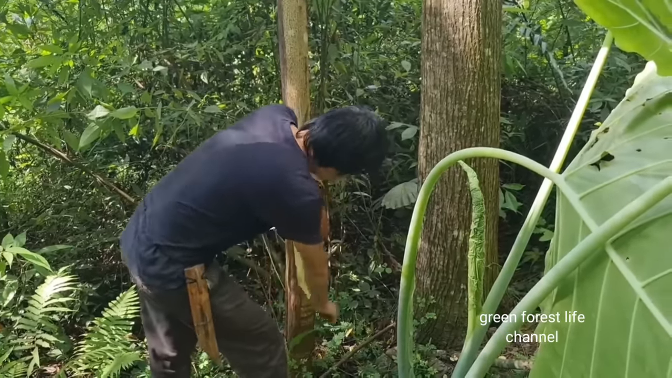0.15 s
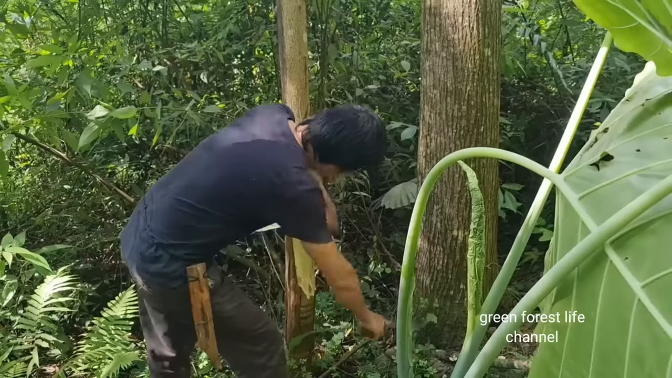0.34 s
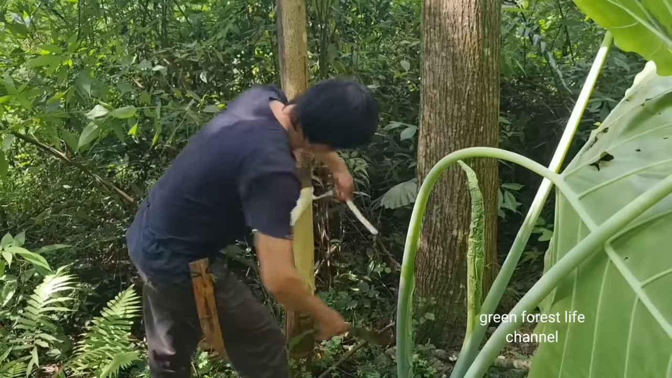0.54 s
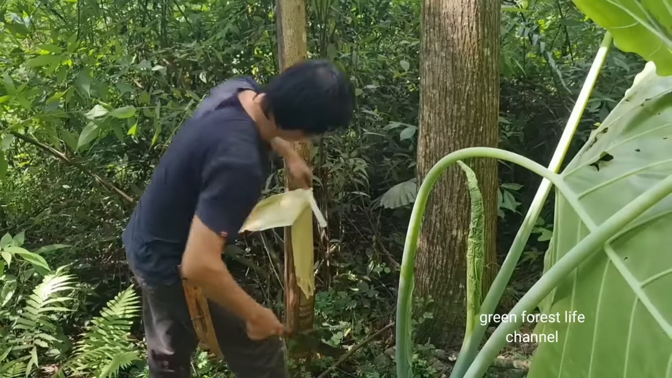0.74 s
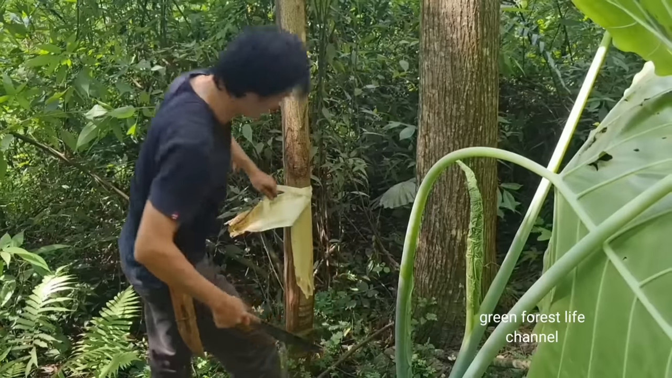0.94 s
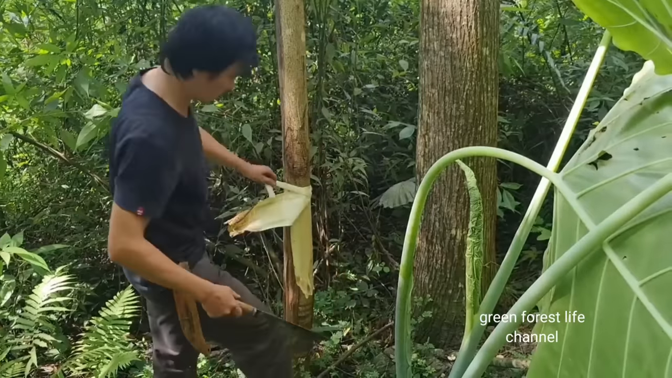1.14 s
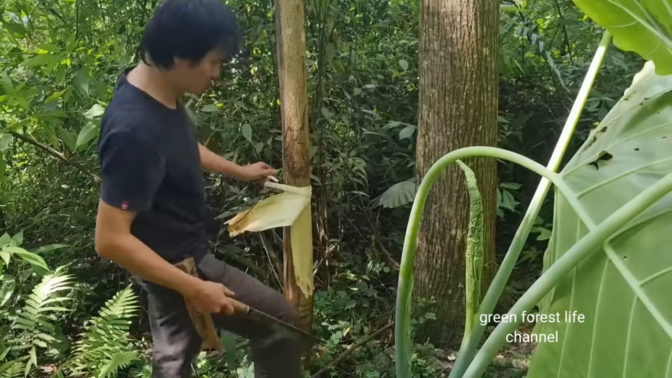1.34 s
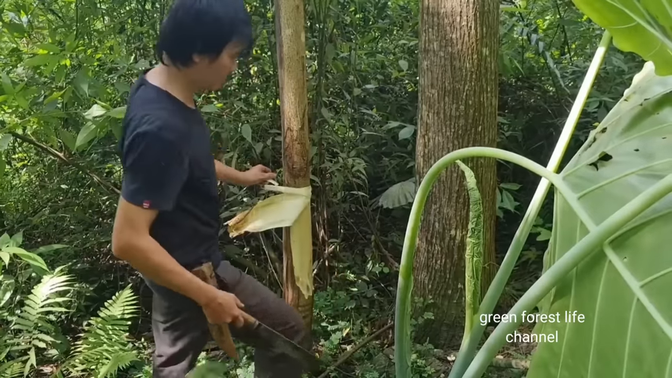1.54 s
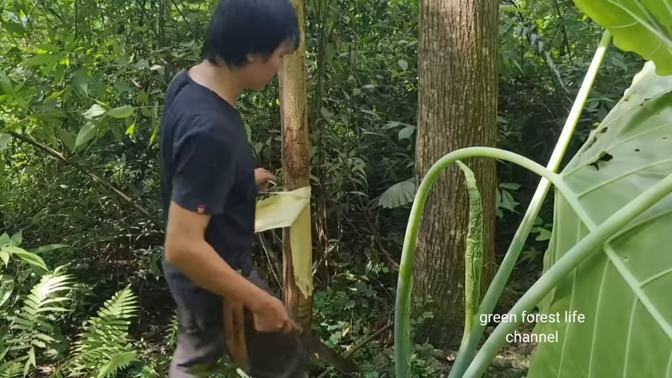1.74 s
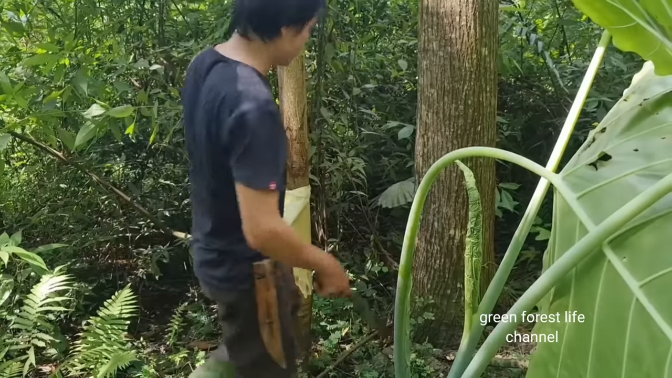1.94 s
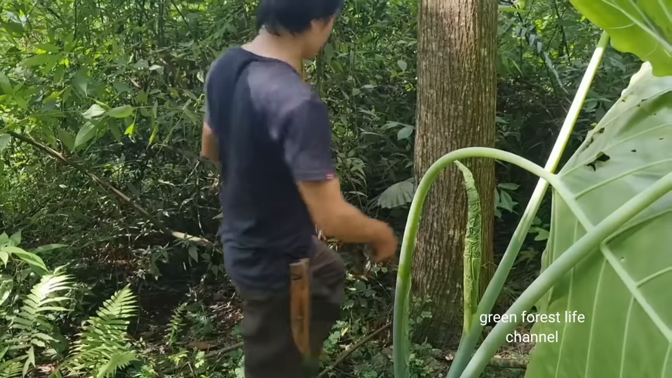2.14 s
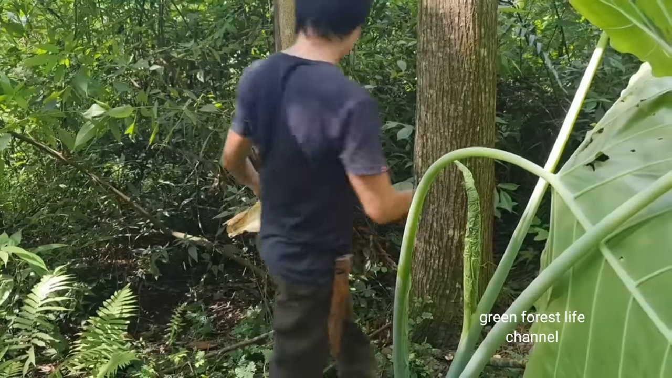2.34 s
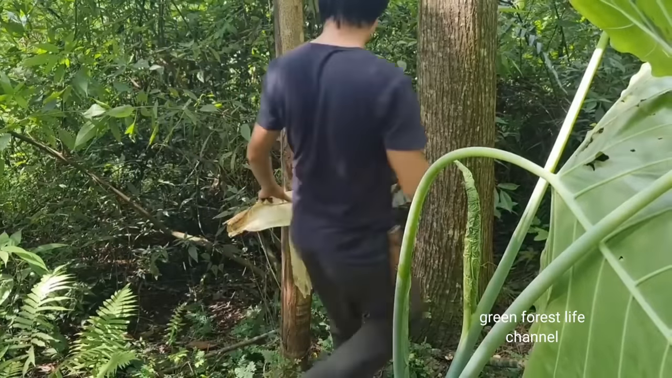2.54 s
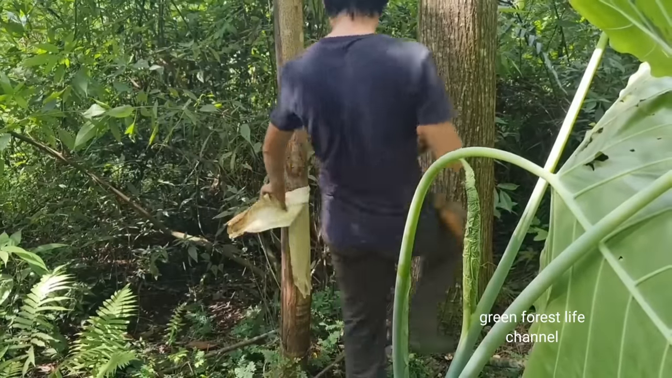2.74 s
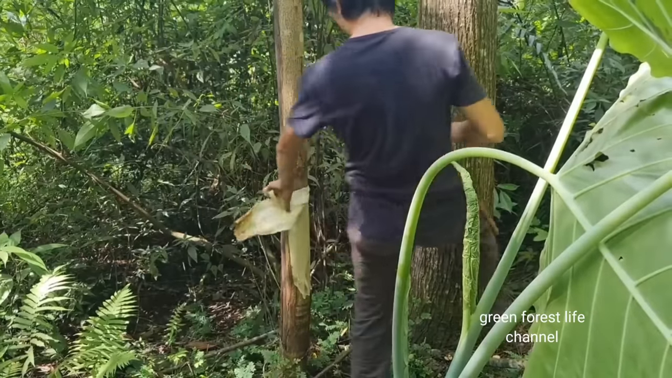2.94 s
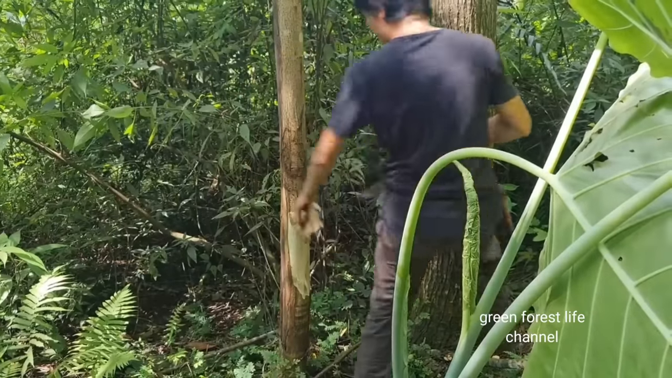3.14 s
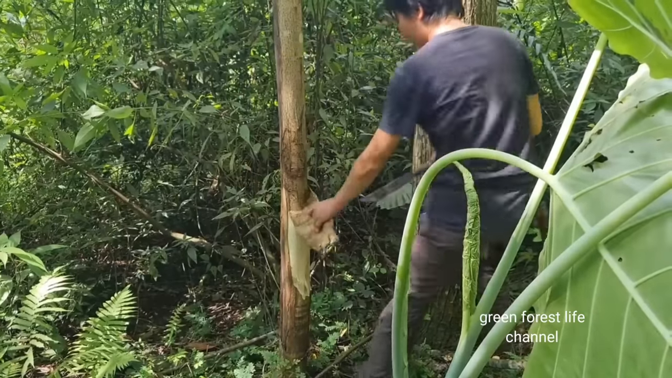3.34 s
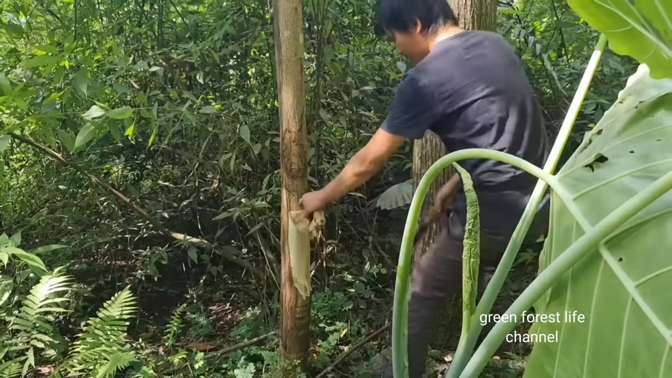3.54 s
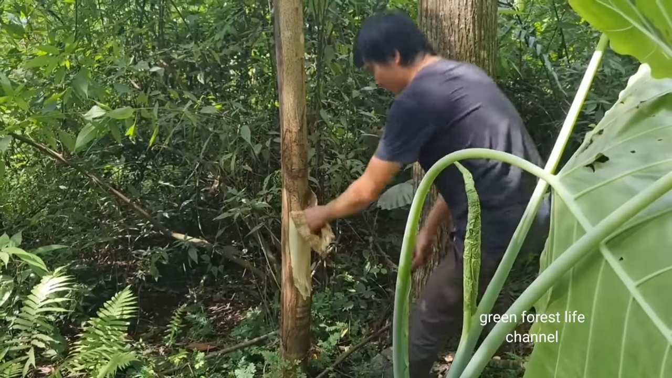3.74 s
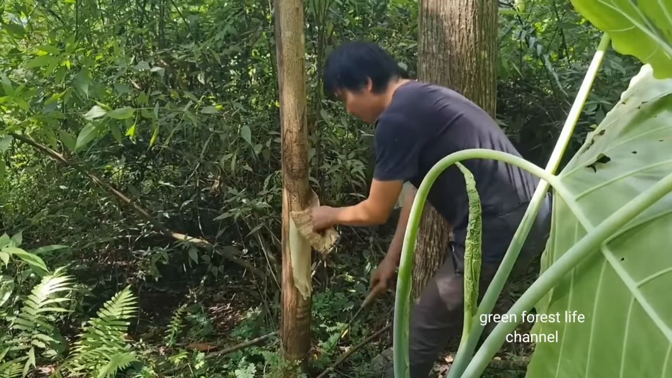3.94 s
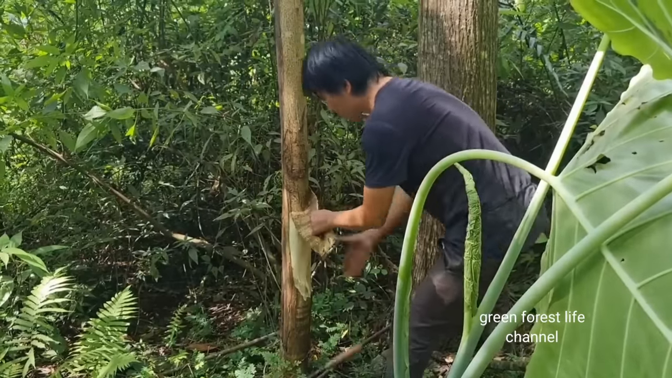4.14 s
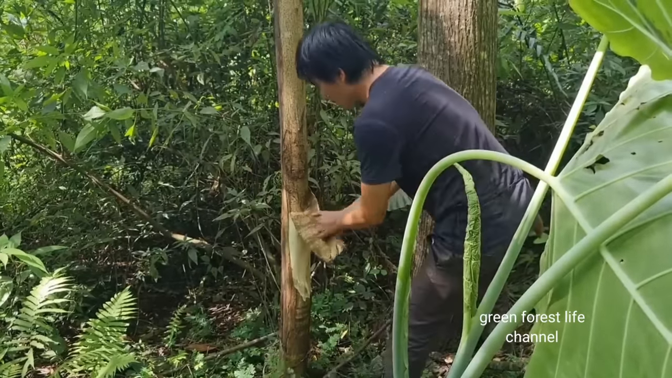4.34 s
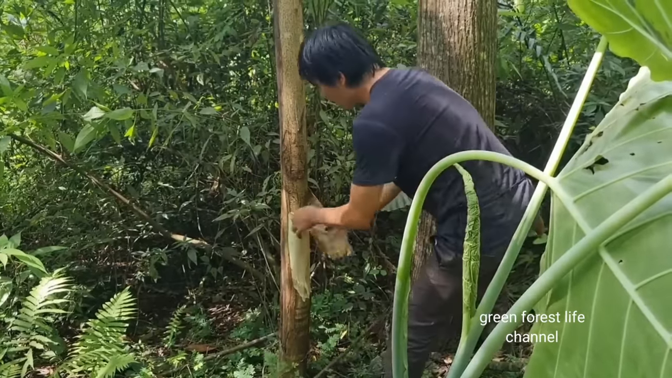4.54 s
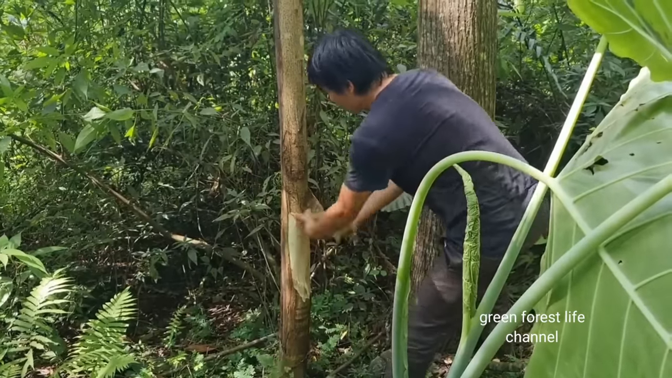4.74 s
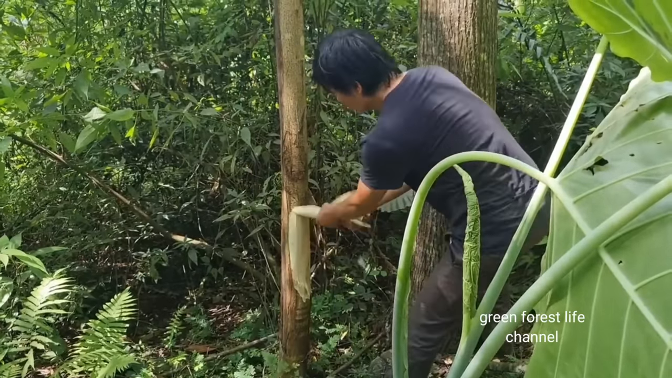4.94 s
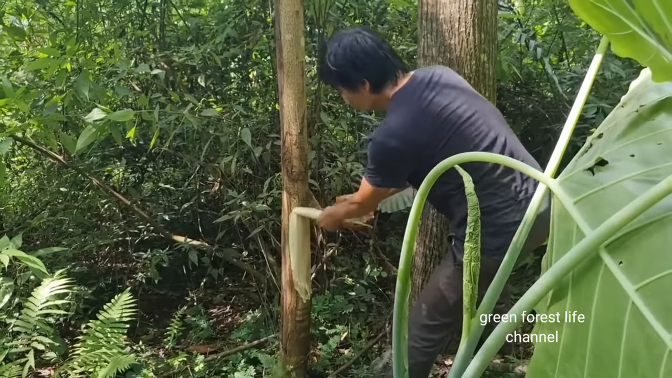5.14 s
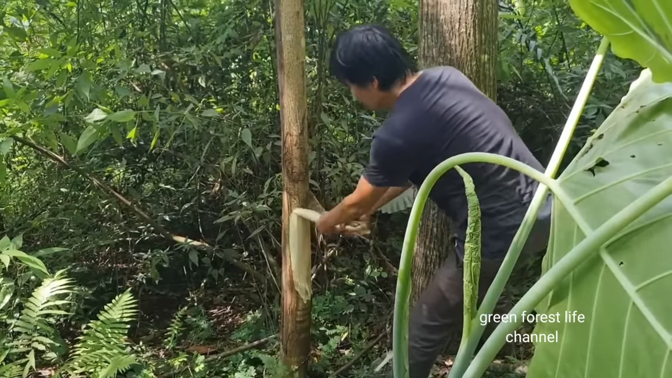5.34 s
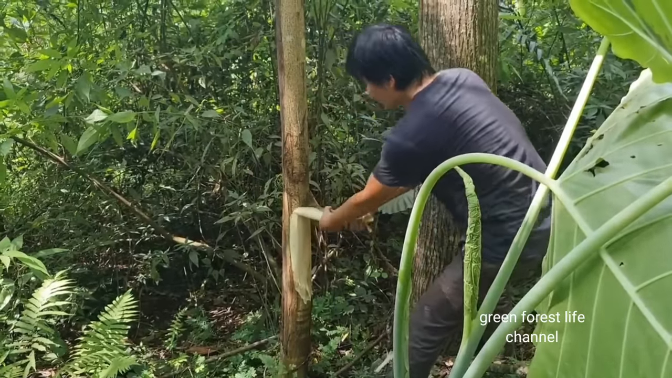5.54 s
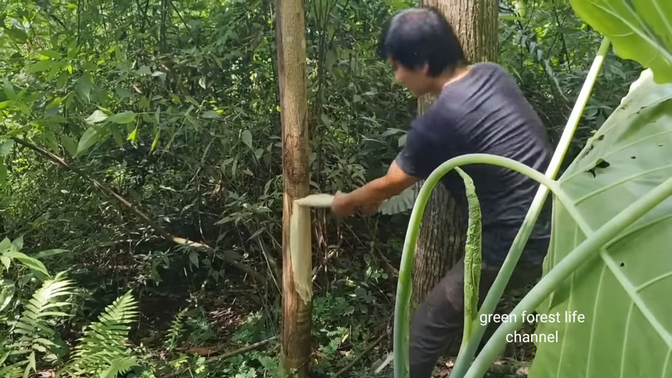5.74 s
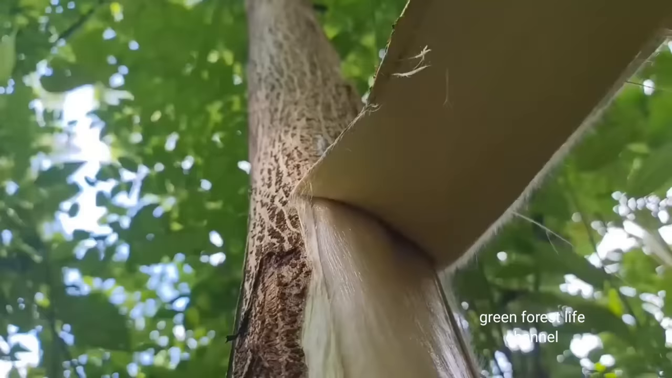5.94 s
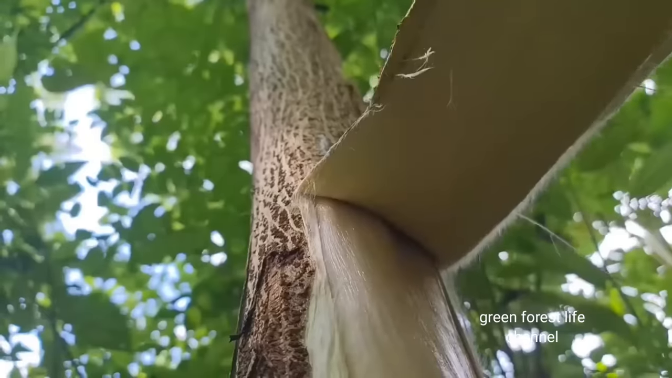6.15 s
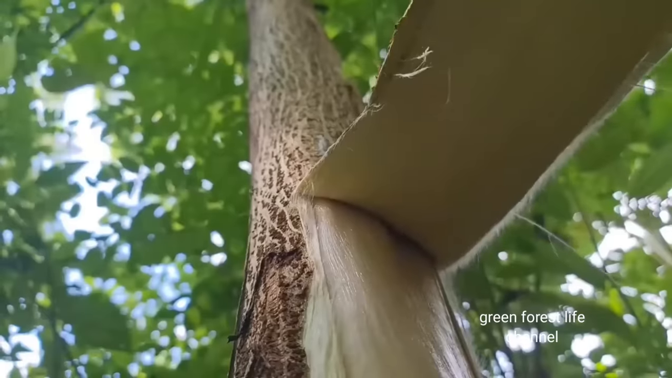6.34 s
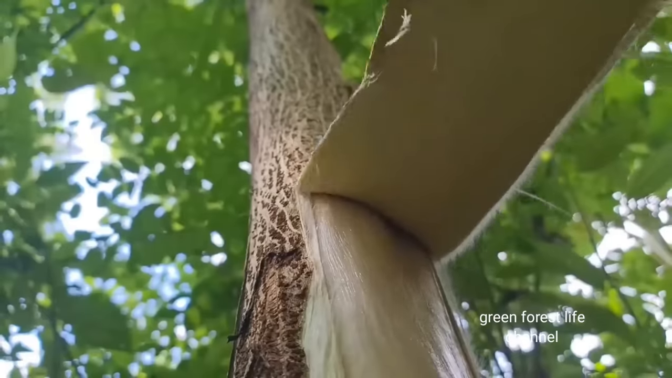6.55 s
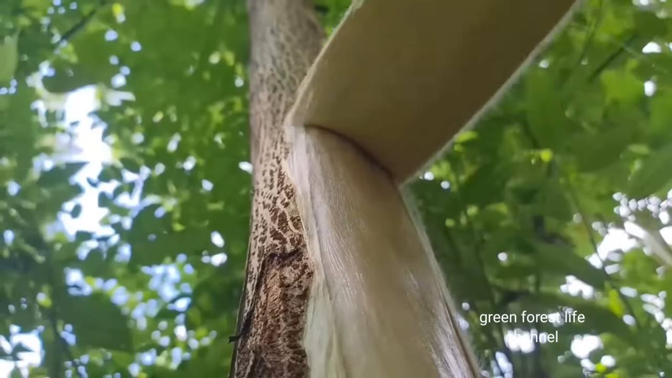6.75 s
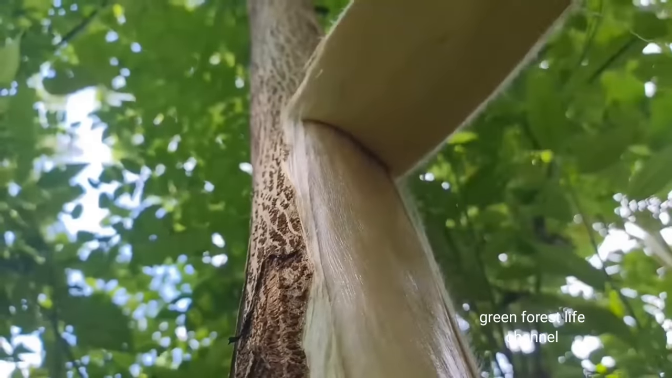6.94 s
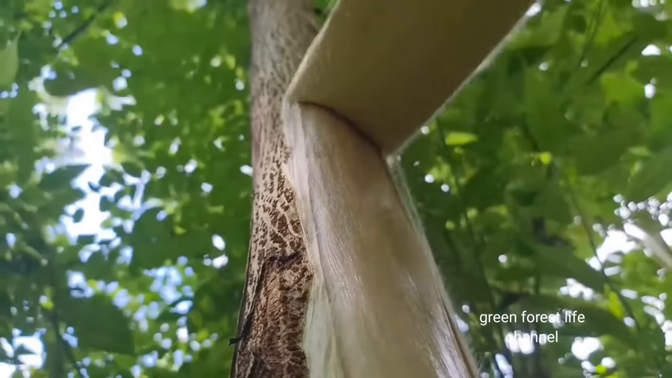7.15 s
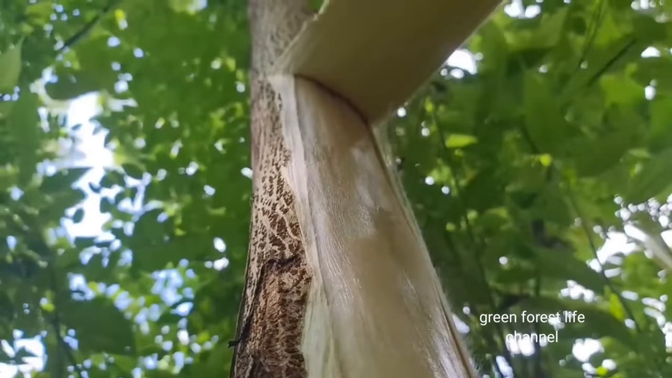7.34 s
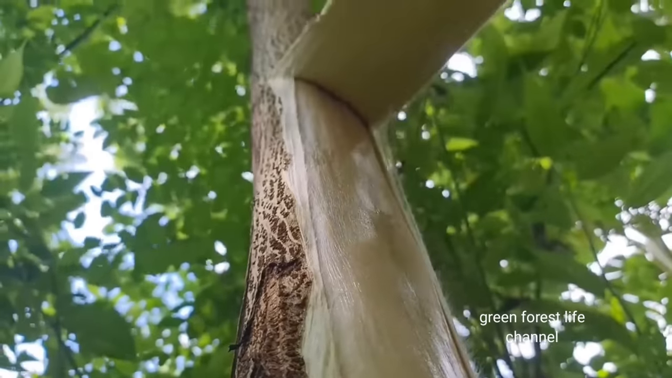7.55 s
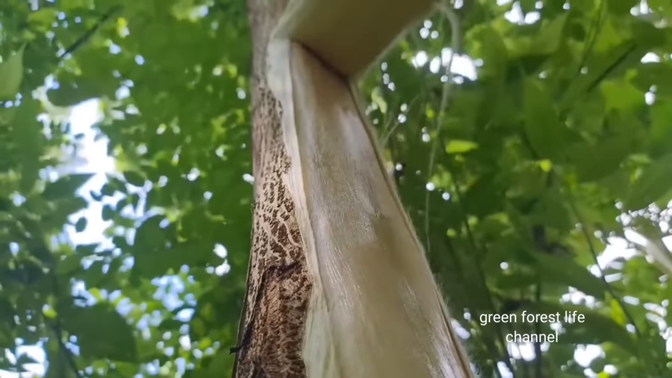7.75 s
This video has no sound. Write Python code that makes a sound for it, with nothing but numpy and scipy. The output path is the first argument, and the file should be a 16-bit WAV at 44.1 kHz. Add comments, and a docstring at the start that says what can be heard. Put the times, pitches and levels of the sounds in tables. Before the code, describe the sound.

Two quick sharp wood cracks with a hint of steel open the scene, then a lull with soft bird peeps. Leafy footsteps follow, with brittle snaps, woody ticks and low soil thumps. A metal blade clanks to the ground and settles. Finally a strip of bark is pulled in strong fibrous rips, bright and zinging. Close outdoor stereo sound, over soft air, low rumble and high insect shimmer.

```python
"""Bark is ripped from a thin tree: random fibre breaks drive crisp fizz, taut zing, strip modes and loose boom.
First it cracks off under a machete in splinter bursts; later the blade clanks down, ringing in beating modes.
Steps are soft sinking thumps, with noise-grain leaf litter, snapping twigs and knocked sticks; scrapes and
creaks are gliding resonances. Coloured noise makes the air and rumble, chirped resonances the insects,
and short sinking sines a bird's notes."""
import sys
import numpy as np
from scipy import signal
from scipy.fft import rfft, irfft, next_fast_len
from scipy.io import wavfile
from scipy.ndimage import uniform_filter1d

SR = 44100
rng = np.random.default_rng(int(sys.argv[2]) if len(sys.argv) > 2 else 0)


def wrap_up_sound(samples):
    """Save the sound to the file named by the first command line argument, as 16-bit audio."""
    columns = np.atleast_2d(samples).T
    # keep every value between -1 and 1, then stretch to whole-number steps
    tamed = np.clip(columns, -1, 1)
    steps = np.round(tamed * 32767).astype(np.int16)
    wavfile.write(sys.argv[1], SR, steps)


N = 347508
TIME = np.arange(N) / SR  # s

# left-right likeness of near sounds: (frequency [Hz], coherence [0-1])
NEAR_COHERENCE = [(100, .88), (350, .82), (700, .55), (3000, .45), (7000, .08), (15000, 0)]
# left-right likeness of surrounding sounds: (frequency [Hz], coherence [0-1])
AROUND_COHERENCE = [(60, .88), (180, .6), (550, .25), (1650, .15), (5000, 0)]
# bass, middle and treble of a fracture: (from [Hz], to [Hz])
FRACTURE_BANDS = [(150, 700), (700, 2500), (2500, 15000)]

# still air: (frequency [Hz], relative density [dB per Hz])
AIR_COLOUR = [(15, -21), (25, -5), (75, -7), (160, -20.5), (614, -16), (2120, -18.5), (3830, -21.5),
              (4750, -18.5), (5880, -23.5), (8350, -26.5), (9550, -43), (10900, -26.5), (15500, -58.5)]
AIR_LEVEL_DB = -61
# rumble that comes and goes: (time [s], relative level [dB])
RUMBLE_LEVEL = [(0, -58), (.7, -81), (1.5, -66.5), (3.6, -54.5), (5.42, -67.5), (6.91, -46.5),
                (7.88, -54.5)]
# rumble spectrum: (frequency [Hz], relative density [dB per Hz])
RUMBLE_COLOUR = [(20, -34), (38, -17.5), (52, -5), (67, 6.5), (82, -3.5), (120, -15), (220, -35)]
# insect choruses: (frequency [Hz], width [Hz], level [dB])
INSECT_CHORUSES = [(4940, 430, -61.5), (8280, 210, -74.5)]

# foot or strip sweeping through litter:
# (start [s], length [s], relative dull scuff level [dB], relative dry crackle level [dB])
SHUFFLES = [(0, 0.42, -60, -49.5), (0.348, 0.1, -61, -44), (1.23, 0.64, -62, -55.5),
            (1.665, 0.21, -51.5, -53), (2.087, 0.61, -56.5, -56.5), (2.331, 0.26, -45.5, -41),
            (2.555, 0.18, -54, -48.5), (3.079, 0.049, -50, -55), (3.155, 0.077, -45, -41),
            (3.29, 0.37, -52.5, -48.5), (3.518, 0.32, -51.5, -49), (3.717, 0.15, -47, -44),
            (6.156, 0.47, -53.5, -48), (7.456, 0.41, -45, -38.5)]
SHUFFLE_PEAK = 0.27  # share of the length at which the sweep is loudest
# faint rustle under the shuffles: (time [s], relative level [dB])
RUSTLE_LEVEL = [(0, -55), (.5, -83), (1.2, -67.5), (1.9, -59), (4.2, -57), (4.7, -67), (6.1, -63.5),
                (6.9, -55), (7.88, -54.5)]
RUSTLE_CRACKLE_DB = -1.5  # crackle drive against scuff drive
# leaves pushed aside: (frequency [Hz], relative density [dB per Hz])
SCUFF_COLOUR = [(71, -34.5), (120, -10), (345, 6), (544, -4.5), (612, -0.5), (993, -5), (1410, 1),
                (1610, -7.5), (4000, -7.5), (5200, -18), (8800, -120)]
# leaves crushed: (frequency [Hz], relative density [dB per Hz])
CRACKLE_COLOUR = [(700, -32.5), (1800, 1), (3200, 0.5), (6500, 2.5), (10000, -5.5), (15000, -6)]

# wood and steel sliding on bark, stems creaking as they bend:
# (start [s], length [s], level [dB], from [Hz], to [Hz])
SCRAPES = [(0.074, 0.19, -47, 2710, 2860), (2.24, 0.091, -52, 1320, 1330), (3.56, 0.12, -49, 793, 610),
           (4.013, 0.5, -56, 420, 490), (6.28, 0.3, -55, 1383, 1470), (6.37, 0.18, -53, 1940, 1850)]

# bark cracking under the blade: (time [s], relative level [dB], bass against middle [dB],
# treble against middle [dB], rise [s], t60 [s], blade ring against crack drive [dB],
# ring centre [Hz], ring width [octaves])
CRACKS = [(.1438, -17.5, -42, -2, 0.00096, 0.019, -49, 3000, .5),
          (.153, -17, -44, -1, 0.0003, 0.041, -21, 3000, 0.43),
          (.168, -3, -26, 1.2, 0.00041, 0.011, -30, 3020, 0.42),
          (.210, -1.5, -19.5, -0.66, 0.00023, 0.034, -14, 8000, 0.82),
          (.360, -28.5, -33, -0.89, 0.011, 0.063, -11, 2630, 0.45)]
# bark fracture spectrum: (frequency [Hz], relative density [dB per Hz])
CRACK_COLOUR = [(88, -51), (150, -19), (420, -13.5), (766, -20), (1150, -5.5), (2650, 0), (3040, -3.5),
                (4310, -3), (6470, -5.5), (12000, -22), (15500, -24)]
# modes of the steel blade: (frequency [Hz], relative level [dB], t60 [s])
BLADE_MODES = [(357, 4, .32), (694, -14, .2), (1206, -9, .2), (1453, -8, .15), (1520, 6, .04),
               (1825, -3.5, .15), (2290, 2, .04), (2503, -11, .24), (2810, 0, .18), (3040, 7.5, .04),
               (3101, -4, .11), (3600, 6, .035), (3833, -12, .26), (4330, 8, .025), (4780, -15, .24),
               (5712, -8, .12), (6900, -16, .16), (14040, -13, .16)]
MAX_RING_OCTAVES = 1.7  # wider rings are held to this

# a bird's faint notes: (time [s])
PEEP_TIMES = [.62, .865, 1.6]
PEEP_HZ, PEEP_S, PEEP_DB, PEEP_SAG_HZ_PER_S = 2160, .08, -63, 1200

# twigs, leaves and stiff fibres snapping: (time [s], relative level [dB],
# bass against middle [dB], treble against middle [dB], t60 [s])
SNAPS = [(1.418, -33.5, -8, -14, 0.025), (1.439, -32, -20, 4, 0.015), (1.539, -31, 0, 36, 0.024),
         (1.733, -23.5, -4, 4, 0.063), (1.749, -22.5, 0, 23, 0.031), (1.82, -24.5, -13, 17, 0.012),
         (2.292, -12, -23, -37, 0.009), (2.38, -16.5, -7, -7, 0.014), (2.441, -19, -1, 1, 0.019),
         (2.4484, -14.5, -32, 9, 0.029), (2.488, -8.5, -61, 4, 0.008), (2.497, -14, -43, 13, 0.017),
         (3.093, -21.5, -21, -33, 0.012), (3.171, -18, -8, -29, 0.027), (3.181, -27, -2, 33, 0.039),
         (3.21, -28, 12, 18, 0.038), (3.367, -20.5, -11, 15, 0.024), (3.584, -31, -11, 3.5, 0.03),
         (3.776, -20.5, 0, 34, 0.039), (3.953, -22.5, -21, 17, 0.015), (4.029, -22.5, -19, 12.5, 0.03),
         (5.101, -35.5, -16.5, -8, 0.051), (5.159, -28, -32, -7, 0.014), (5.7512, -28.5, -39, -12, 0.019),
         (5.988, -24, -28, -17, 0.023), (6.311, -19, -34, 8, 0.018)]
SNAP_RISE = 0.12  # share of t60
# snap spectrum: (frequency [Hz], relative density [dB per Hz])
SNAP_COLOUR = [(71, -39.5), (120, -17), (541, -16), (1080, -6), (2200, -7.5), (2980, -1), (3370, -3),
               (6460, -6), (8590, -12), (15500, -12)]

# sticks and stems knocked by feet and legs: (time [s], level [dB], pitch [Hz], t60 [s])
KNOCKS = [(1.57, -42.5, 900, 0.026), (2.294, -20.5, 1090, 0.015), (2.381, -25.5, 1230, 0.025),
          (2.449, -21, 3600, .014), (3.096, -30, 900, 0.034), (3.116, -37, 950, .03),
          (3.184, -32, 680, .03), (3.21, -27.5, 880, 0.028), (3.587, -34.5, 3330, 0.031)]
# feet landing on soft soil: (time [s], relative level [dB], initial pitch [Hz], t60 [s])
STEPS = [(1.787, -32, 69.5, 0.17), (2.443, -38, 159, 0.097), (2.47, -31.5, 117, 0.1),
         (3.177, -18, 145, 0.1), (3.241, -31, 278, 0.044), (3.752, -34, 186, 0.082)]

# machete landing, skidding, striking again and settling: (time [s], relative level [dB],
# bass against middle [dB], treble against middle [dB], rise [s], t60 [s],
# blade ring against blow drive [dB], ring centre [Hz], ring width before its cap [octaves])
CLANKS = [(4.3285, -6.5, -8.5, -11, 0.0005, 0.05, -13.5, 1600, .7),
          (4.341, -18, -2, 6, 0.0047, 0.08, -20, 2200, 1.5),
          (4.3612, 1.5, -5, 6, 0.002, 0.038, -14.5, 1650, 2.1),
          (4.588, -37, -26, -14, .001, .016, 8, 2280, .14),
          (4.590, -40, -27.5, -6, 0.001, 0.012, 13.5, 3190, .055)]
# landing spectrum: (frequency [Hz], relative density [dB per Hz])
CLANK_COLOUR = [(59, -70), (100, -36), (378, -6), (519, -12.5), (936, -3), (1520, -5), (2130, -4),
                (3540, -10.5), (8580, -29), (15500, -34.5)]

# pulls on the strip; light ones fizz, hard ones tear off a length of bark:
# (start [s], length [s], attack [s], release [s], force [dB], force change after attack [dB/s],
# relative boom of loose strip [dB], relative zing of taut fibres at end of attack [dB], zing [Hz])
PULLS = [(5.635, 0.51, 0.17, 0.12, -48.5, -6, -6.5, -11, 5400),
         (5.879, .24, 0.17, 0.11, -39, -2, 5.5, 3, 6050), (6.267, 0.38, 0.04, .06, -61, 11, 11.5, 2, 5000),
         (6.488, 0.33, 0.15, 0.065, -30.5, 56, -2.5, 8, 6070),
         (6.657, .25, 0.12, 0.077, -17.5, -28.5, 0, -2.5, 5950),
         (7.049, 0.32, 0.17, 0.065, -33.5, -2, 8.5, -18, 6600),
         (7.107, 0.29, 0.14, 0.15, -16, -5, -2, -1.5, 6040),
         (7.293, 0.39, 0.1, 0.03, -53.5, 39, 1, 2, 3570),
         (7.612, 0.12, 0.073, 0.036, -18.5, 0, 2, 4.5, 5620),
         (7.688, 0.17, 0.037, 0.084, -23, -47, 0.5, 0, 4800)]
SLACK_BOOM_DB = -13.5  # boom change as a pull eases fully in or out
ZING_FADE_DB_PER_S = 18  # tautest fibres part
# parting fibres: (frequency [Hz], relative density [dB per Hz])
FIZZ_COLOUR = [(150, -19), (600, -15), (2000, -10.5), (2900, 4.5), (4000, 3), (7800, 4), (12500, 7),
               (16000, 3.5)]
# boom of the loose strip: (frequency [Hz], relative density [dB per Hz])
BOOM_COLOUR = [(60, -12), (150, -18.5), (280, -2.5), (480, -8), (700, -9), (950, -4.5), (1200, 3),
               (1700, 5.5), (2200, -0.5), (2800, -0.5), (4500, -17.5)]
# resonances of the taut strip: (frequency at rest [Hz], width [Hz], level against force [dB])
STRIP_MODES = [(1170, 145, -21.5), (1690, 310, -16), (2670, 440, -18.5), (4316, 330, -12), (5830, 510, -11),
               (6720, 140, -8.5)]

# decay among the trees: (frequency [Hz], t60 [s])
TREE_T60 = [(100, 0.293), (500, 0.13), (2800, 0.42), (7000, 0.37), (15000, 0.74)]
EDGE_HZ = 15750


def amp(db):
    """Decibels to gain."""
    return 10 ** (np.asarray(db) / 20)


def unit(x):
    """Scales to rms 1."""
    return x / np.sqrt(np.mean(x ** 2) + 1e-20)


def read(points, hz):
    """Reads a table on a log-frequency axis."""
    f, value = np.transpose(points)
    return np.interp(np.log(hz + 1), np.log(f + 1), value)


def add(mix, start_s, sound):
    """Adds a stereo sound in place, cut at the end of the mix."""
    part = mix[:, round(start_s * SR):][:, :sound.shape[-1]]
    part += sound[..., :part.shape[1]]


def colour(x, spectrum, size=4096):
    """Minimum-phase filter: nothing sounds before its cause."""
    hz = abs(np.fft.fftfreq(size, 1 / SR))
    log_gain = np.log(amp(read(spectrum, hz)))
    response = np.exp(np.conj(signal.hilbert(log_gain)))
    taps = np.fft.ifft(response).real[:size // 2]
    return signal.oaconvolve(x, taps[None], axes=1)[:, :x.shape[1]]


def pair(z, coherence):
    """Mixes two unrelated signals as mid and side to set left-right coherence by frequency."""
    size = next_fast_len(z.shape[1])
    same = read(coherence, np.fft.rfftfreq(size, 1 / SR))
    mid, side = rfft(z, size) * np.sqrt([(1 + same) / 2, (1 - same) / 2])
    return irfft([mid + side, mid - side], size)[:, :z.shape[1]]


def noise(spectrum, coherence):
    """Steady stereo noise of rms 1."""
    white = rng.standard_normal((2, N))
    return unit(colour(pair(white, coherence), spectrum))


def grains(per_s, spread_db):
    """Sizes of random tiny fractures, with expected power 1 at any rate."""
    chance = np.minimum(per_s / SR, 1)
    size = unit(amp(spread_db * np.minimum(rng.exponential(1, N), 4)))
    return size * (rng.random(N) < chance) / np.sqrt(chance)


def clicks(sizes):
    """Gives each fracture a random push on the left and on the right."""
    return pair(rng.standard_normal((2, len(sizes))) * sizes, NEAR_COHERENCE)


def resonate(x, hz, width_hz):
    """One-pole resonance, shifted to a fixed or moving frequency, of peak gain 1."""
    turn = np.exp(2j * np.pi * np.cumsum(hz * np.ones(x.shape[-1])) / SR)
    r = np.exp(-np.pi * width_hz / SR)
    return 2 * (turn * signal.lfilter([1 - r], [1, -r], x * turn.conj())).real


def resonate_twice(x, hz, width_hz):
    """Two equal resonances in series give steeper skirts; rms 1."""
    return unit(resonate(resonate(x, hz, width_hz), hz, width_hz))


def wander(per_s):
    """Slow random curve: normal draws joined by straight lines."""
    knots = np.arange(0, N / SR + 1, 1 / per_s)
    return np.interp(TIME, knots, rng.standard_normal(len(knots)))


def mode(hz, t60_s, size):
    """One dying resonance; the phases of the two sides agree less in the treble."""
    t = np.arange(size) / SR
    side_phase = rng.standard_normal((2, 1)) * (1 - read(NEAR_COHERENCE, hz)) / 5
    phase = rng.random() + side_phase  # cycles
    return amp(-60 * t / t60_s) * np.sin(2 * np.pi * (hz * t + phase))


def stroke(start_s, length_s, attack_s, release_s):
    """One move of an arm or a leg: eases in, holds, eases out."""
    rise = np.clip((TIME - start_s) / attack_s, 0, 1)
    fall = np.clip((start_s + length_s - TIME) / release_s, 0, 1)
    return (np.sin(np.pi / 2 * rise) * np.sin(np.pi / 2 * fall)) ** 2


def burst(spectrum, bass_db, treble_db, rise_s, t60_s, scatter_db, scatter_t60_s, size=8192):
    """A fracture: a dying rush of splinters, then its scatter off ground and stems."""
    t = np.arange(size) / SR
    after = np.maximum(t - rise_s, 0)
    direct = amp(-60 * after / t60_s)
    scatter = amp(scatter_db - 60 * after / scatter_t60_s)
    rush = clicks(np.minimum(t / rise_s, 1) * np.hypot(direct, scatter))
    x = colour(rush, spectrum)
    # correct the band powers towards the given balance
    power, hz = (abs(rfft(x)) ** 2).sum(0), np.fft.rfftfreq(size, 1 / SR)
    tone = []
    for (low, high), db in zip(FRACTURE_BANDS, (bass_db, 0, treble_db)):
        band_power = power[(hz > low) & (hz < high)].sum()
        tone.append((np.sqrt(low * high), db - 10 * np.log10(band_power)))
    return unit(colour(x, tone)) * np.sqrt(np.mean(rush ** 2))


def insects(trill_hz=36, sweep=0.085):
    """Noise-driven resonances; each chirp of the fast trill slides down in pitch."""
    slide = 1 + sweep * (.5 - (trill_hz * TIME + wander(per_s=10) / 2) % 1)
    out = np.zeros((2, N))
    for hz, width_hz, db in INSECT_CHORUSES:
        out += amp(db) * resonate_twice(rng.standard_normal((2, N)), hz * slide, width_hz)
    return out


def forest():
    """Coloured noise: still air and a low rumble that comes and goes, plus insects."""
    air = amp(AIR_LEVEL_DB) * noise(AIR_COLOUR, AROUND_COHERENCE)
    rumble_db = np.interp(TIME, *np.transpose(RUMBLE_LEVEL)) + 3.0
    rumble = amp(rumble_db) * noise(RUMBLE_COLOUR, AROUND_COHERENCE)
    balance_db = [[-.8], [.8]]  # left, right
    return air + rumble * amp(balance_db) + insects()


def footwork():
    """Strength of scuff and of crackle: each shuffle swells out of the faint rustle."""
    scuff = amp(np.interp(TIME, *np.transpose(RUSTLE_LEVEL)))
    crackle = scuff * amp(RUSTLE_CRACKLE_DB)
    for start, length, scuff_db, crackle_db in SHUFFLES:
        sweep = stroke(start, length, SHUFFLE_PEAK * length, (1 - SHUFFLE_PEAK) * length)
        scuff = np.hypot(scuff, amp(scuff_db) * sweep)
        crackle = np.hypot(crackle, amp(crackle_db) * sweep)
    return scuff, crackle


def sticks(per_s, low_hz, high_hz, cycles, count=48, size=4096):
    """Many small pieces of wood knock together, each with its own short note; rms 1."""
    hits, piece = grains(per_s, spread_db=3.5), rng.integers(0, count, N)
    place = (np.arange(count) + rng.random(count)) / count
    notes_hz = low_hz * (high_hz / low_hz) ** place
    out = np.zeros((2, N))
    for at in np.flatnonzero(hits):
        hz = notes_hz[piece[at]]
        t60_s = cycles / np.sqrt(hz * low_hz)
        add(out, at / SR, hits[at] * mode(hz, t60_s, size))
    return unit(out)


def litter():
    """Leaves are pushed aside (dull) and crushed (crisp), and sticks among them tick."""
    pushed, crushed = footwork()
    scuff = unit(colour(clicks(grains(per_s=2000, spread_db=2.0)), SCUFF_COLOUR))
    rattle = amp(-5.5) * sticks(per_s=240, low_hz=340, high_hz=3400, cycles=42)
    breaks = grains(per_s=8000, spread_db=1.2)
    crackle = amp(1) * unit(colour(clicks(breaks), CRACKLE_COLOUR))
    return (scuff + rattle) * pushed + crackle * crushed


def scrapes(width_hz=90):
    """Uneven slips excite one gliding resonance that swells and fades."""
    out, slips = np.zeros((2, N)), clicks(grains(per_s=1200, spread_db=3.5))
    for start, length, db, from_hz, to_hz in SCRAPES:
        part = slips[:, round(start * SR):round((start + length) * SR)]
        along = np.linspace(0, 1, part.shape[1])
        hz = from_hz + (to_hz - from_hz) * along
        add(out, start, amp(db) * np.sin(np.pi * along) * resonate_twice(part, hz, width_hz))
    return out


def blade(centre_hz, octaves, size=20000):
    """Steel rings in close, beating pairs; only modes near the given centre speak."""
    out = np.zeros((2, size))
    for hz, db, t60 in BLADE_MODES:
        distance = np.log2(hz / centre_hz) / min(octaves, MAX_RING_OCTAVES)
        share = np.exp(-.5 * distance ** 4)
        if share > .01:
            partner = mode(hz + rng.uniform(12, 30), t60, size)
            out += amp(db) * share * (mode(hz, t60, size) + .4 * partner)
    return out


def blows(rows, spectrum, gain_db, scatter_db, scatter_t60_s):
    """Each blow is a fracture-like burst plus the ring of the blade."""
    out = np.zeros((2, N))
    for s, db, *shape, ring_db, centre_hz, octaves in rows:
        add(out, s, amp(db + gain_db) * burst(spectrum, *shape, scatter_db, scatter_t60_s))
        add(out, s, amp(db + gain_db + ring_db) * blade(centre_hz, octaves))
    return out


def cracks():
    """The blade levers the bark off the wood: splinter bursts with some ring."""
    return blows(CRACKS, CRACK_COLOUR, gain_db=-6, scatter_db=-16.5, scatter_t60_s=.12)


def bird():
    """Short, soft sine whistles, each sinking a little."""
    t = np.arange(0, PEEP_S, 1 / SR)
    hz = PEEP_HZ - PEEP_SAG_HZ_PER_S * t
    swell = np.sin(np.pi * t / PEEP_S) ** 2
    peep = amp(PEEP_DB) * swell * np.sin(2 * np.pi * np.cumsum(hz) / SR)
    out = np.zeros((2, N))
    for s in PEEP_TIMES:
        add(out, s, peep)
    return out


def snaps(gain_db=-12.5, linger=6.2):
    """Twigs and stiff fibres break; a longer crunch also builds and settles for longer."""
    out = np.zeros((2, N))
    for s, db, bass_db, treble_db, t60 in SNAPS:
        snap = burst(SNAP_COLOUR, bass_db, treble_db, SNAP_RISE * t60, t60,
                     scatter_db=-4.5, scatter_t60_s=linger * t60)
        add(out, s, amp(db + gain_db) * snap)
    return out


def knocks(second_ratio=0.895, second_db=-5):
    """A knocked stick answers with a short pair of wooden notes."""
    out = np.zeros((2, N))
    for s, db, hz, t60 in KNOCKS:
        second = mode(hz * second_ratio, t60 / second_ratio, size=8192)
        add(out, s, amp(db) * (mode(hz, t60, size=8192) + amp(second_db) * second))
    return out


def footfalls(gain_db=-5.0, rise_s=0.0026, phase_sag_per_s=1.0):
    """A heel pushes the soil: a few soft cycles that sink in pitch."""
    out, t = np.zeros((2, N)), np.arange(SR // 4) / SR
    for s, db, hz, t60 in STEPS:
        envelope = amp(db + gain_db - 60 * t / t60) * (1 - np.exp(-t / rise_s))
        add(out, s, envelope * np.sin(2 * np.pi * hz * t * (1 - phase_sag_per_s * t)))
    return out


def machete():
    """The falling blade strikes twice and settles: impact bursts and steel ring."""
    return blows(CLANKS, CLANK_COLOUR, gain_db=-6.5, scatter_db=-17.5, scatter_t60_s=.11)


def pulls():
    """Force on the strip, and its power-weighted boom dB, zing dB and zing Hz."""
    power, tone = np.zeros(N), np.zeros((3, N))
    for start, length, attack, release, db, db_per_s, boom_db, zing_db, zing_hz in PULLS:
        held = np.clip(TIME - start, 0, length) - attack  # s, negative during the attack
        taut = stroke(start, length, attack, release)
        share = (amp(db + db_per_s * np.maximum(held, 0)) * taut) ** 2 + 1e-14
        power += share
        tone[0] += share * (boom_db + SLACK_BOOM_DB * (1 - taut))
        tone[1] += share * (zing_db - ZING_FADE_DB_PER_S * held)
        tone[2] += share * zing_hz
    return np.sqrt(power), *(tone / power)


def strip_ring(parting, bend=0.025):
    """The taut strip resonates from the first pull; its notes slide as it bends."""
    out, first = np.zeros((2, N)), round(PULLS[0][0] * SR)
    drive = clicks(parting[first:])
    tension = 1 + bend * wander(per_s=20)[first:]
    for hz, width_hz, db in STRIP_MODES:
        out[:, first:] += amp(db) * unit(resonate(drive, hz * tension, width_hz))
    return out


def glance(x, share=.28, t60_s=.04, below_hz=7500, count=3, size=1024):
    """All but the top fizz glances off trunk and strip by shifting paths: bands come and go."""
    low = signal.sosfiltfilt(signal.butter(2, below_hz, fs=SR, output="sos"), x)
    decay = amp(-60 * np.arange(size) / SR / t60_s)
    paths = rng.standard_normal((count, size)) * decay
    weights = np.array([wander(per_s=18) for _ in paths])
    weights /= np.linalg.norm(weights, axis=0)
    glanced = np.zeros((2, N))
    for weight, path in zip(weights, paths):
        taps = path[None] / np.linalg.norm(path)
        glanced += signal.oaconvolve(weight * low, taps, axes=1)[:, :N]
    return x - low + np.sqrt(1 - share) * low + np.sqrt(share) * glanced


def rips(full_db=-20, full_per_s=24000, crowding=0.64):
    """Fibres part, denser as the pull grows; taut ones zing, the strip rings, its loose end booms."""
    force, boom_db, zing_db, zing_hz = pulls()
    per_s = 900 + full_per_s * (force / amp(full_db)) ** crowding
    parting = grains(per_s, spread_db=-0.5)
    # bundles of fibres hold and let go: an uneven tear, most of all under a light pull
    uneven_db = .8 + 1.5 * amp(-30) / (force + amp(-30))
    parting = parting * amp(uneven_db * unit(uniform_filter1d(rng.standard_normal(N), size=140)))
    taut = grains(per_s=2600, spread_db=2.5)
    zing = resonate_twice(clicks(taut), zing_hz, width_hz=1800)
    rattle = sticks(per_s=440, low_hz=667.0, high_hz=1938, cycles=55)
    boom = unit(unit(colour(clicks(parting), BOOM_COLOUR)) + amp(-5.0) * rattle)
    fizz = unit(colour(clicks(parting), FIZZ_COLOUR))
    tear = amp(4.5) * fizz + strip_ring(parting)
    tear += amp(boom_db - 5.0) * boom + amp(zing_db - 1.5) * zing
    return force * glance(tear)


def echoes(x, build_s=0.0017, size=256):
    """Trunks and foliage return a thin, soft tail: noise decaying by frequency."""
    hz, t, z = signal.stft(rng.standard_normal((2, SR)), SR, nperseg=size)
    decay = amp(-60 * t / read(TREE_T60, hz)[:, None]) * (1 - np.exp(-t / build_s))
    tail = signal.istft(z * decay, SR, nperseg=size)[1]
    return signal.fftconvolve(x, tail / np.linalg.norm(tail[0]), axes=1)[:, :N]


def scene():
    """Echoing blows, steps and bird; dry close rips and litter; the forest all round."""
    echoing = cracks() + machete() + snaps() + knocks() + footfalls() + scrapes() + bird()
    close = rips()
    return echoing + close + amp(-14.0) * echoes(echoing) + litter() + forest()


def record(dry):
    """Clips any peaks beyond full scale, then limits the band."""
    taps = signal.firwin(401, EDGE_HZ, window=("kaiser", 8), fs=SR)
    return signal.oaconvolve(np.clip(dry, -1, 1), taps[None], "same")


dry = scene()
out = record(dry)
wrap_up_sound(out)
```